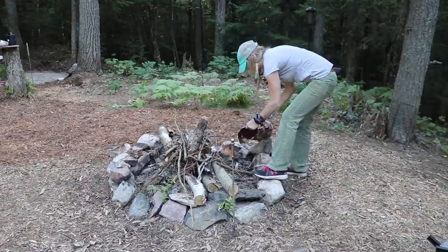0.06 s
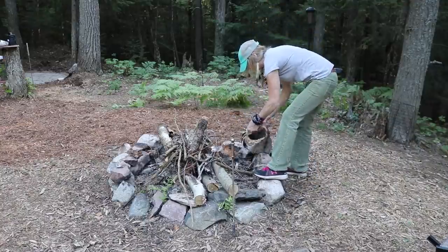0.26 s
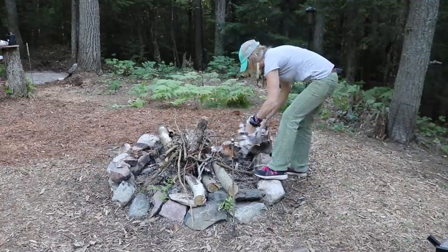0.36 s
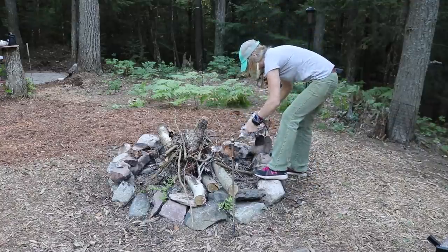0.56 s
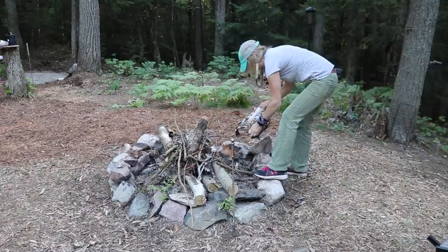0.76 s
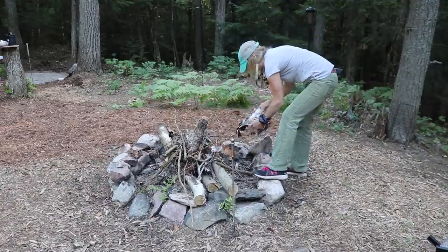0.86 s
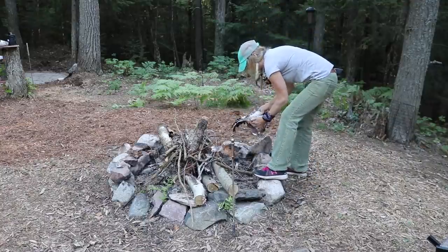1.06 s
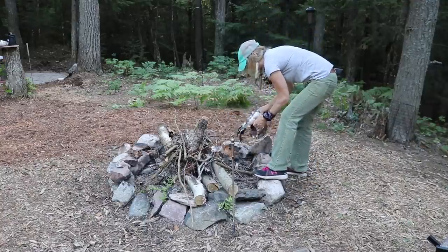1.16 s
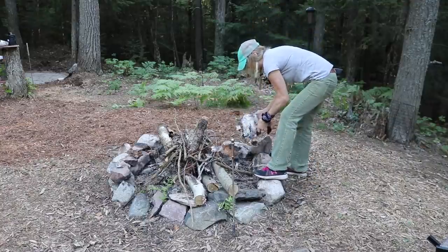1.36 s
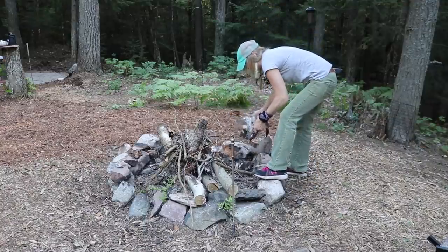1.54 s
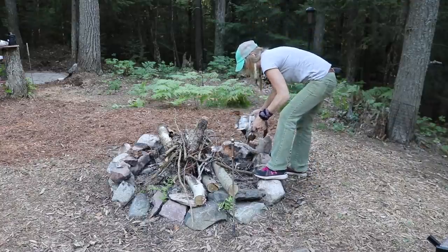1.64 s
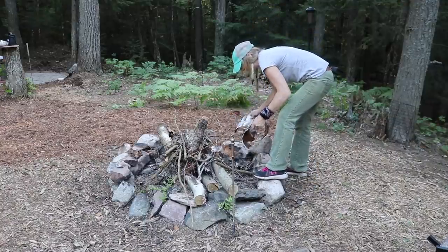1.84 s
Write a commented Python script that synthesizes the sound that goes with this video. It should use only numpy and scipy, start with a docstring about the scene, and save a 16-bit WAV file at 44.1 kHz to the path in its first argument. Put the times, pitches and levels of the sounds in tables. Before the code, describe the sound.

Dry bark and sticks being handled: faint rubbing at first, then a dense burst of sharp snaps, knocks and crunching from 0.2 to 0.5 s. It thins to light rustle, with a small knock and scrape near 0.9 s. A heavy hollow slab knock at 1.32 s leads into crackling crunches until 1.6 s, then faint rustle and a soft tap at 1.84 s. Still forest air, short woodland tail, a few metres away.

```python
"""Forest clearing: dry bark and sticks are pressed into a fire pit a few metres from a microphone pair.
The bark snaps, knocks on the wood and stones and crunches in two main bursts, with light rustling between.
Snaps, knocks and one heavy slab are short filtered bursts and damped modes; rustle is a stream of grains.
The pit scatters each snap and thud for a few milliseconds and the trees return a faint tail."""
import sys
import numpy as np
from scipy import signal
from scipy.fft import rfft, irfft, next_fast_len
from scipy.io import wavfile
from scipy.ndimage import uniform_filter1d

SR = 44100
rng = np.random.default_rng(int(sys.argv[2]) if len(sys.argv) > 2 else 0)


def store_wav(level_fs):
    """Save 16-bit WAV to argv[1]."""
    pcm = np.round(np.clip(np.atleast_2d(level_fs), -1, 1) * 32767)
    wavfile.write(sys.argv[1], SR, pcm.T.astype(np.int16))


N = 83790  # length [samples]
HIT_S = 0.006  # a hit carries the energy of rms 1 held this long [s]


def amp(db):
    """Decibels to gain."""
    return 10 ** (np.asarray(db) / 20)


def unit(x):
    """Scale to rms 1."""
    return x / np.sqrt(np.mean(x ** 2) + 1e-20)


def blow(x):
    """Scale a hit to the energy of rms 1 held for HIT_S."""
    return x / np.linalg.norm(x) * np.sqrt(HIT_S * SR)


def along(points, hz):
    """Read (frequency, value) points on a log frequency axis."""
    point_hz, values = np.transpose(points)
    return np.interp(np.log(hz + 1), np.log(point_hz + 1), values)


def level(rows):
    """Turn (time [s], level [dB]) points into one gain per sample."""
    return amp(np.interp(np.arange(N) / SR, *np.transpose(rows)))


def causal(x, gain, size=4096):
    """Minimum-phase filter with a gain given as a function of frequency, made by folding the cepstrum."""
    cepstrum = irfft(np.log(gain(np.fft.rfftfreq(size, 1 / SR))))
    cepstrum[1:size // 2] *= 2
    cepstrum[size // 2 + 1:] = 0
    impulse = irfft(np.exp(rfft(cepstrum)))
    return signal.fftconvolve(x, impulse)[:len(x)]


def colour(x, spectrum):
    """Filter with a (frequency [Hz], level [dB]) spectrum."""
    return causal(x, lambda hz: amp(along(spectrum, hz)))


def resonate(x, hz, q):
    """One resonance: a band-pass with unit gain at its centre."""
    b, a = signal.bilinear([hz / q, 0], [1, hz / q, hz * hz], SR / (2 * np.pi))
    return signal.lfilter(b, a, x)


def add(out, s, x):
    """Mix x into out at time s [s]."""
    i = max(round(s * SR), 0)
    out[i:i + len(x)] += x[:N - i]


# steady forest air: (frequency [Hz], relative level [dB])
AIR_SPECTRUM = [(20, -10), (60, 6.5), (150, 9), (400, -4), (3500, -4), (5000, -12.5)]
AIR_DB = -57


def forest_air():
    """Still air in the clearing: steady filtered noise."""
    return amp(AIR_DB) * unit(colour(rng.standard_normal(N), AIR_SPECTRUM))


# tail from the trunks: (frequency [Hz], time to fall 60 dB [s])
TRUNK_DECAY = [(300, 0.49), (6000, 0.5), (15000, 0.25)]
TRUNKS_DB = -21


def forest_tail(x):
    """The faint tail from the trunks: decaying noise 10 ms late, shortest in the high treble."""
    hz, t, z = signal.stft(rng.standard_normal(SR // 2), SR, nperseg=256)
    t60 = along(TRUNK_DECAY, hz)[:, None]
    tail = signal.istft(z * amp(-60 * t / t60), SR, nperseg=256)[1]
    delayed = np.pad(tail / np.linalg.norm(tail), (SR // 100, 0))
    return amp(TRUNKS_DB) * signal.fftconvolve(x, delayed)[:N]


SCATTER_S, SCATTER_FALL_DB = 0.0039, 14  # early reflections: span [s] and fall over it [dB]
AFTER_DB, AFTER_T60_S = -7, 0.049  # weaker, longer reflections
EVEN_HZ = 450  # bandwidth over which the colour is evened out [Hz]
DIRECT_DB, EDGE_DIRECT_DB = -8.5, -4.5  # direct sound relative to the scatter


def scatter(direct_db, size=4096):
    """A click and dense reflections from the curled bark and the stones, even in broad colour."""
    t = np.arange(size) / SR
    early = amp(-SCATTER_FALL_DB * t / SCATTER_S) / (1 + (t / SCATTER_S) ** 8)
    after = amp(AFTER_DB - 60 * t / AFTER_T60_S)
    x = unit(rng.standard_normal(size) * (early + after))
    x[0] += amp(direct_db) * np.sqrt(size)
    power = uniform_filter1d(np.abs(rfft(x)) ** 2, round(EVEN_HZ * size / SR))
    return causal(x, lambda hz: power ** -.5)


# sideways reflections: (frequency [Hz], gain [dB])
SIDE_SPECTRUM = [(1000, -76), (4000, -59), (13000, -54)]


def side_reflections(bark):
    """A little scattered treble from the sides, opposite in sign at the two microphones."""
    return colour(signal.fftconvolve(bark, scatter(direct_db=-40))[:N], SIDE_SPECTRUM)


def grains(rate, spread_db):
    """Tiny fractures at random moments [per s], a few much larger than the rest."""
    sizes = amp(spread_db * np.minimum(rng.exponential(size=N), 4)) * rng.choice([-1, 1], N)
    return sizes * (rng.random(N) < rate / SR)


CHIPS_PER_S, CHIP_SPREAD_DB, CHIP_Q = 900, 3.5, 7
LARGEST_CHIP_HZ, SMALLEST_CHIP_HZ = 602, 3890  # ring of each [Hz]


def chips(count=20):
    """Tiny fractures, each ringing a chip of its own size: the small, high ones break most often."""
    pitches = np.geomspace(LARGEST_CHIP_HZ, SMALLEST_CHIP_HZ, count)
    shares = pitches / pitches.sum()
    crunch = np.zeros(N)
    for hz, share in zip(pitches, shares):
        fractures = grains(CHIPS_PER_S * share, CHIP_SPREAD_DB)
        crunch += resonate(fractures, hz, CHIP_Q) / np.sqrt(share)
    return unit(crunch)


# bark rubbing and crumbling, before RUB_TRIM_DB: (time [s], level [dB])
RUB_LEVEL = [(0, -51.5), (.06, -42.5), (.09, -46.5), (.16, -48), (.22, -30), (.258, -37.5), (.35, -39.5),
             (.405, -51), (.425, -31.5), (.48, -48), (.6, -55.5), (.872, -70), (.89, -37.5), (.918, -34.5),
             (.94, -48), (.99, -47), (1.05, -61.5), (1.085, -59.5), (1.12, -46), (1.16, -59.5), (1.24, -53),
             (1.38, -45), (1.405, -28), (1.48, -30.5), (1.535, -47), (1.58, -46), (1.61, -35.5),
             (1.65, -55), (1.9, -52.5)]
# fine flakes scraping in the treble, before FLAKES_TRIM_DB: (time [s], level [dB])
FLAKES_LEVEL = [(0, -65), (.17, -61.5), (.23, -49), (.41, -63), (.422, -41), (.445, -56.5), (.52, -64.5),
                (.87, -82), (.91, -47.5), (.97, -80), (1.375, -62), (1.405, -43.5), (1.47, -43),
                (1.53, -61.5), (1.595, -50), (1.65, -62), (1.9, -77)]
# rubbed bark: (frequency [Hz], relative level [dB])
RUB_SPECTRUM = [(30, -41), (90, -5), (180, -1), (400, 2.5), (750, -1.5), (1200, -3.5), (2000, 0),
                (2800, -3.5), (3700, -1), (4500, -15), (6000, -14.5), (15000, -48)]
# splintery treble of flakes and of snaps: (frequency [Hz], relative level [dB])
EDGE_SPECTRUM = [(2500, -33), (4500, 8), (5800, -0.5), (7000, 2.5), (8500, 0.5), (11000, -0.5),
                 (15500, -10.5)]
RUB_TRIM_DB, FLAKES_TRIM_DB = 0.5, 2.5
CHIP_SHARE, CHIP_GROWTH = .7, .6  # power share of chips at full pressure; exponent of growth with effort


def rustle():
    """Light rubbing sheds mostly fine crumbs and flakes; under pressure more whole chips break off."""
    crumbs = unit(grains(rate=2200, spread_db=2.5))
    flakes = unit(grains(rate=3100, spread_db=5.0))
    effort = level(RUB_LEVEL)
    pressure = (effort / effort.max()) ** CHIP_GROWTH
    rub = unit(colour(crumbs + amp(-5) * rng.standard_normal(N), RUB_SPECTRUM))
    crunch = unit(colour(chips(), RUB_SPECTRUM))
    fine = unit(colour(flakes + amp(-5) * crumbs, EDGE_SPECTRUM))
    chip_power = CHIP_SHARE * pressure
    bark = np.sqrt(1 - chip_power) * rub + np.sqrt(chip_power) * crunch
    return amp(RUB_TRIM_DB) * effort * bark + amp(FLAKES_TRIM_DB) * level(FLAKES_LEVEL) * fine


RADIATE_HZ = 110  # the ringing modes are high-passed below this [Hz]


def ring(modes, size=4096):
    """Damped modes struck together, each level varying at random by about 1 dB."""
    t = np.arange(size) / SR
    x = np.zeros(size)
    for k, (hz, db, t60) in enumerate(modes):
        envelope = amp(db + rng.normal(0, 1) - 60 * t / t60)
        x += (-1) ** k * envelope * np.sin(2 * np.pi * hz * t)
    return blow(signal.lfilter(*signal.butter(2, RADIATE_HZ, "highpass", fs=SR), x))


# modes of the bark slab: (frequency [Hz], mean relative level [dB], time to fall 60 dB [s])
SLAB_MODES = [(202, -9, 0.045), (341, -3.5, 0.039), (458, -6.5, 0.039), (683, 1.5, 0.033), (976, -1, 0.032),
              (1182, 5, 0.018), (1510, -8.5, 0.05)]
# blunt contact of slab or stick: (frequency [Hz], relative level [dB])
CONTACT_SPECTRUM = [(35, -21), (150, 4), (1400, -5), (2000, -8), (4000, -4.5), (8000, -42.5)]
SLAB_S, SLAB_DB = 1.3223, -14.5  # landing time [s], level [dB]


def slab():
    """The bark slab landing on the pile: one heavy, hollow knock of ringing modes and a blunt contact."""
    out = np.zeros(N)
    contact = blow(colour(scatter(direct_db=-3.5), CONTACT_SPECTRUM))
    add(out, SLAB_S, amp(SLAB_DB) * (ring(SLAB_MODES) + amp(-10) * contact))
    return out


# knocks on the pile, and the scraped bark slab's body ringing at .908, 1.445 and 1.465 s: (time [s], level
# [dB], pitch [Hz])
KNOCKS = [(0.121, -42, 389), (.201, -24, 330), (0.2234, -24.5, 335), (.224, -19.5, 1400),
          (0.232, -29.5, 436), (0.4271, -24.5, 806), (0.43, -27.5, 405), (.490, -36, 727),
          (.526, -35.5, 383), (0.627, -44, 742), (.630, -44, 170), (0.8805, -32.5, 281),
          (.8802, -33, 739), (.908, -40, 667), (1.130, -44, 828), (1.133, -43.5, 451),
          (1.404, -37, 164), (1.445, -27.5, 730), (1.465, -31, 610), (1.590, -35, 1290),
          (1.591, -37, 539), (1.617, -34, 321), (1.829, -42, 305), (1.8408, -38.5, 271),
          (1.8415, -39, 617)]
# bending modes of a stick: (multiple of its pitch, mean relative level [dB], time to fall 60 dB [s])
STICK_MODES = [(1, 8.5, 0.057), (1.8, -0.5, 0.031), (2.5, -8, 0.095)]
THUD_DB, STICK_RING_DB = -4, -2  # relative to the knock's level
KNOCK_Q = .7


def knocks():
    """Blunt contacts give a damped thud and ring the stick briefly."""
    out = np.zeros(N)
    for s, db, hz in KNOCKS:
        contact = colour(scatter(direct_db=-6), CONTACT_SPECTRUM)
        thud = blow(resonate(contact, hz, KNOCK_Q))
        stick = ring([(hz * ratio, mode_db, t60) for ratio, mode_db, t60 in STICK_MODES])
        add(out, s, amp(db) * (amp(THUD_DB) * thud + amp(STICK_RING_DB) * stick))
    return out


# bark snapping: (time [s], level [dB], ring pitch [Hz],
#                 hollow body [dB re level], splintery edge [dB re level])
BARK_SNAPS = [(.1565, -37.5, 2700, -25, -12), (0.1986, -28.5, 2290, -4, -33),
              (0.2152, -21.5, 1796, -16, -13.5), (0.2204, -16, 2070, -11, -20),
              (0.2428, -24.5, 2190, -2, -10), (0.2657, -21, 2260, -8.5, -15),
              (.2672, -19, 3610, -20, -16)  , (0.2903, -25, 1840, -12, -12), (.3140, -29.5, 2190, -2, -28),
              (0.3711, -31, 1424, -7, -17), (.378, -33.5, 1440, -3, -28), (.4165, -31.5, 2180, -2.5, -6.5),
              (0.4271, -27, 2190, 1, -13), (0.4634, -33.5, 3180, -1, -35), (.525, -40.5, 1300, 1.5, -17),
              (0.559, -43.5, 2230, -21, -18), (0.5909, -45.5, 1290, -9, -11), (.623, -44.5, 1720, -16, -28),
              (0.8803, -36, 1470, -2, -10.5), (.911, -44.5, 3300, -10, -6), (.950, -39, 3090, -25, -8.5),
              (1.031, -41, 3790, -5, -23), (1.064, -51, 3080, -0.5, -9), (1.130, -43.5, 1315, -8, -16),
              (1.195, -48, 4000, -10, -15), (1.2925, -38.5, 2700, -4.5, -28),
              (1.3222, -21.5, 2620, -9.5, -27), (1.343, -41, 3640, 2, -19),
              (1.3863, -23, 2270, -12.5, -17.5), (1.403, -23, 2860, -5, -21.5), (1.4102, -34, 3000, 1, -14),
              (1.4267, -31.5, 1870, -8, -13), (1.4424, -29.5, 1810, -6, -26),
              (1.454, -25, 3370, -2.5, -11.5), (1.4722, -23.5, 1880, -28, -17),
              (1.505, -32.5, 2600, -10, -8.5), (1.5453, -36, 3040, -15, -21), (1.564, -37, 3760, -16, -5.5),
              (1.5892, -20.5, 3075, -10.5, -6.5), (1.596, -31.5, 3320, 3.5, -27),
              (1.615, -33.5, 2160, -11, -15), (1.843, -46, 1960, -33, -8.5)]
# sharp crack of a fracture: (frequency [Hz], relative level [dB])
CRACK_SPECTRUM = [(500, -27), (1100, -11), (1600, -3), (2300, -3.5), (2900, -4.5), (3700, -3.5),
                  (4300, -19), (5200, -29), (9000, -40)]
# hollow body of a snap: (frequency [Hz], relative level [dB])
BODY_SPECTRUM = [(30, -43), (90, -18.5), (180, 2), (350, -4), (700, 5), (1200, -1), (1700, -2.5),
                 (3000, -52)]
SNAP_RING_DB, SNAP_Q = -3.5, 19  # ring of the broken piece, relative to the crack
SPLINTER_RATIO, SPLINTER_DB = 2.7, -4  # the piece's second bending mode: multiple of pitch, level re edge


def snaps():
    """Each fracture has a crack that rings the broken piece, a hollow body and a splintery edge."""
    out = np.zeros(N)
    for s, db, hz, body_db, edge_db in BARK_SNAPS:
        crack = blow(colour(scatter(DIRECT_DB), CRACK_SPECTRUM))
        piece = blow(resonate(scatter(direct_db=4.0), hz, SNAP_Q))
        ringing_crack = blow(crack + amp(SNAP_RING_DB) * piece)
        body = blow(colour(scatter(DIRECT_DB), BODY_SPECTRUM))
        splinter = blow(resonate(scatter(DIRECT_DB), SPLINTER_RATIO * hz, SNAP_Q))
        treble = blow(colour(scatter(EDGE_DIRECT_DB), EDGE_SPECTRUM))
        edge = blow(treble + amp(SPLINTER_DB) * splinter)
        add(out, s, amp(db) * (ringing_crack + amp(body_db) * body + amp(edge_db) * edge))
    return out


def scene():
    """The handling sits in the centre, over still forest air; a little treble arrives from the sides."""
    bark = rustle() + slab() + knocks() + snaps()
    mid = forest_air() + forest_tail(bark) + bark
    side = side_reflections(bark)
    return np.array([mid + side, mid - side])


# each microphone's own noise: (frequency [Hz], relative level [dB])
MIC_NOISE_SPECTRUM = [(20, 24), (3000, -7.5), (7000, 6.5)]
MIC_NOISE_DB, TOP_HZ = -64, 16000  # noise level [dB], band limit [Hz]


def record(dry):
    """A nearly mono microphone pair with slight independent noise and a sharp band limit."""
    noise = np.array([unit(colour(rng.standard_normal(N), MIC_NOISE_SPECTRUM)) for _ in dry])
    x = dry + amp(MIC_NOISE_DB) * noise
    m = next_fast_len(N + SR // 10)
    passed = np.fft.rfftfreq(m, 1 / SR) < TOP_HZ
    return irfft(rfft(x, m) * passed, m)[:, :N]


dry = scene()
out = record(dry)
store_wav(out)
```